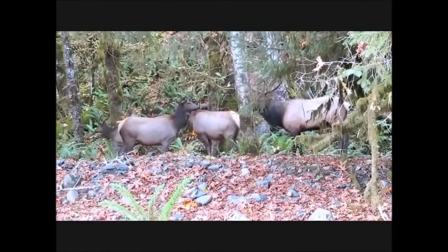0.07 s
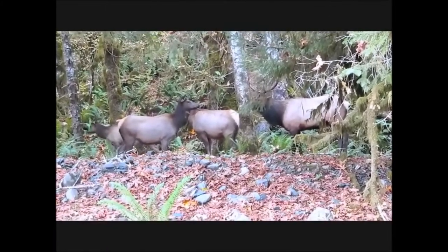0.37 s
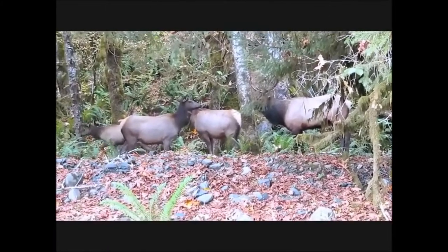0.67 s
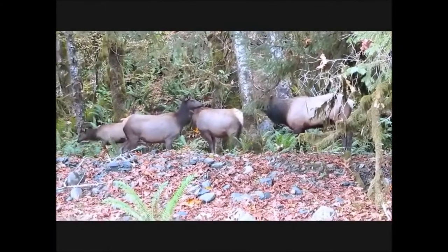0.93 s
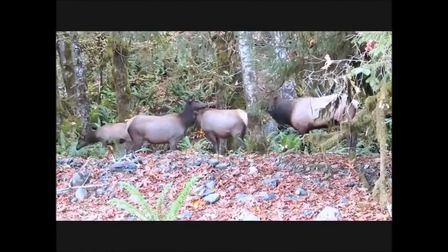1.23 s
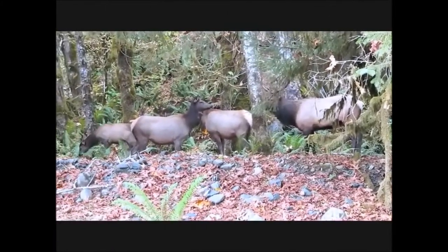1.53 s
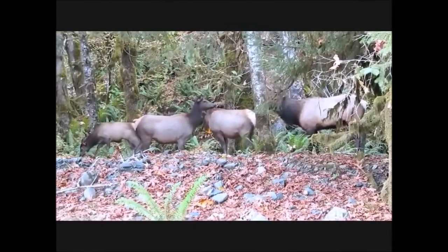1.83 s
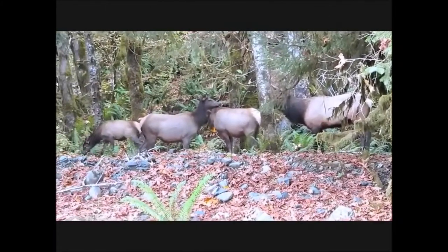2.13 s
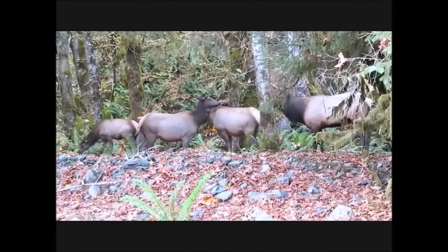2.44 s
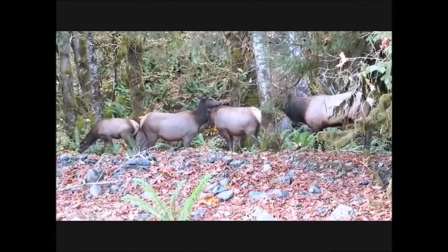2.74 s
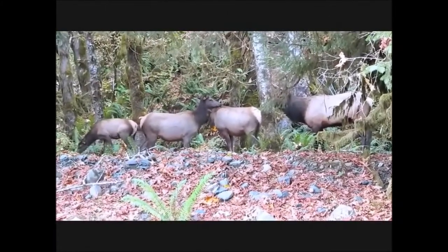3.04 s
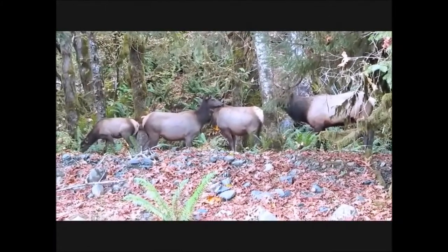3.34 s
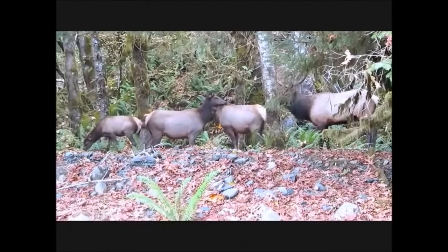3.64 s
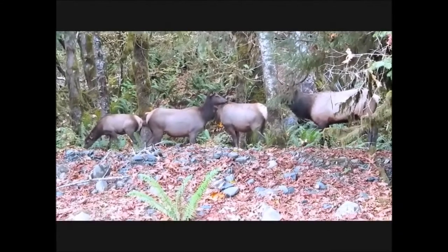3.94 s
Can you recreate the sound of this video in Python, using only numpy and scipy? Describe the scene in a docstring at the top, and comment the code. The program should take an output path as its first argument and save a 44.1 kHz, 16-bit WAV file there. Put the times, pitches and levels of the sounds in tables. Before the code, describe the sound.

Chattering birds in the woods, joined by sliding elk calls and rapid knocks on a trunk.

```python
"""Elk and squabbling birds at the forest edge

High elk mews slide down through the throat's resonances while birds squabble in fast twitters,
sharp notes, squeals and two thin whistles. Rapid woody knocks, like a woodpecker's drumming,
ring a trunk and peter out within a second and a half. An engine idles close by with a faint
whine over a soft bed of forest air, and the trees scatter the calls."""
import sys
import numpy as np
from scipy import signal
from scipy.fft import rfft, irfft
from scipy.io import wavfile
from scipy.ndimage import uniform_filter1d, map_coordinates

SR = 44100
rng = np.random.default_rng(int(sys.argv[2]) if len(sys.argv) > 2 else 0)


def put_to_file(sound):
    """Save the sound as 16-bit audio at rate SR, in the file named by the first command-line argument."""
    columns = np.atleast_2d(sound).T  # one column per channel
    safe = np.clip(columns, -1, 1)
    whole_steps = np.round(safe * 32767)
    wavfile.write(sys.argv[1], SR, whole_steps.astype(np.int16))


N = 176400


def amp(db):
    """Decibels to gain."""
    return 10 ** (np.asarray(db) / 20)


def unit_rms(x):
    """Scales to rms 1."""
    return x / np.sqrt(np.mean(x ** 2) + 1e-20)


def along(points, t):
    """Reads every column of an automation curve at the times t."""
    at, *columns = np.transpose(points)
    return [np.interp(t, at, c) for c in columns]


def across(points, hz):
    """Reads every column of a spectrum on a log-frequency axis."""
    at, *columns = np.transpose(points)
    return [np.interp(np.log(hz + 1), np.log(at + 1), c) for c in columns]


def add(mix, start, sound):
    """Mixes a stereo sound in at a start time in seconds."""
    part = mix[:, max(round(start * SR), 0):][:, :sound.shape[1]]
    part += sound[:, :part.shape[1]]


def wobble(t, rate_hz):
    """Smooth random modulation of about unit depth."""
    return map_coordinates(rng.standard_normal(512), [(t - t[0]) * rate_hz], order=3, mode="wrap")


def phase(hz):
    """Running phase of a pitch curve."""
    return 2 * np.pi * np.cumsum(hz) / SR


def fade(t, rise_s=.00072, fall_s=.005):
    """Attack, hold and release on quarter-sine ramps."""
    attack = np.sin(np.pi / 2 * np.clip((t - t[0]) / rise_s, 0, 1))
    release = np.sin(np.pi / 2 * np.clip((t[-1] - t) / fall_s, 0, 1))
    return attack * release


def place(x, pan_db, degrees, spacing_m=.054, sound_m_per_s=343):
    """Pans by level and arrival time; positive is left."""
    lag = spacing_m * np.sin(np.radians(degrees)) / sound_m_per_s
    delay = np.exp(-2j * np.pi * np.fft.rfftfreq(len(x), 1 / SR) * lag)
    return np.array([x * amp(pan_db / 2), irfft(rfft(x) * delay, len(x)) * amp(-pan_db / 2)])


def echoes(x, t60_s, taps_per_s=2000):
    """Sparse reflections off trunks and leaves, with one decay time or a curve of them by band."""
    taps = rng.standard_normal((2, SR)) * (rng.random((2, SR)) < taps_per_s / SR)
    taps[:, :100] = 0  # pre-delay
    hz, t, bands = signal.stft(taps, SR, nperseg=256)
    t60 = across(t60_s, hz)[0][:, None] if np.ndim(t60_s) else t60_s
    tail = signal.istft(bands * np.exp(-np.log(1000) * t / t60), SR, nperseg=256)[1]
    return signal.fftconvolve(x, tail / np.linalg.norm(tail, axis=1, keepdims=True), axes=1)[:, :N]


# Drifting idle speed: t/s, cycle rate/Hz
IDLE_SPEED = [(0, 17.6), (.8, 17.65), (1.3, 17.9), (1.95, 17.72), (2.25, 17.25), (2.65, 18.1), (2.85, 17.7),
              (3.1, 18.2), (3.45, 18.42), (4, 17.55)]
# Exhaust harmonics: multiple of the cycle rate, relative level/dB
EXHAUST_ORDERS = [(1, -22), (2, 0), (3, -16), (4, -2), (5, -4), (6, -10), (7, -24), (8, -21), (12, -32),
                  (13, -31)]
# Engine bay whine: t/s, f/Hz, level/dB
BAY_WHINE = [(0, 528.3, -68), (1.6, 533, -70), (2.03, 532, -69), (2.22, 515, -64.5), (2.65, 548, -72.5),
             (2.82, 529, -66.5), (2.95, 485, -81)]

def engine(throb_db=-46, pipe_smear=.55):
    """A low exhaust throb and a thin wavering whine, dead centre; the pipe delays the higher orders."""
    t = np.arange(N) / SR
    cycle = phase(along(IDLE_SPEED, t)[0])
    throb = sum(amp(db + .88 * wobble(t, 6.87)) * np.cos(k * cycle - pipe_smear * k ** 2)
                for k, db in EXHAUST_ORDERS)
    hz, db = along(BAY_WHINE, t)
    whine = amp(db + 1.8 * wobble(t, 33)) * np.sin(phase(hz * (1 + .01 * wobble(t, 41))))
    return amp(throb_db) * throb + whine


# Tone of the air bed: f/Hz, relative noise density/dB
AIR_SPECTRUM = [(60, 2.5), (130, -5), (200, -6), (330, -18), (600, -15.5), (1200, -21.5), (3800, -24),
                (6300, -29), (9800, -32), (11000, -40.5), (15500, -49)]
# How mono the bed is: f/Hz, left-right correlation
AIR_CORRELATION = [(250, 1), (500, 0.92), (1000, 0.73), (3000, 0.98), (12000, 0.59)]

def forest_air(level_db=-58.5):
    """Steady low rush and far hiss of the forest."""
    hz = np.fft.rfftfreq(2048, 1 / SR)
    shape = (2, len(hz), N // 512 + 5)
    left, spread = rng.standard_normal(shape) + 1j * rng.standard_normal(shape)
    shared = np.clip(across(AIR_CORRELATION, hz)[0], -1, 1)[:, None]
    right = shared * left + np.sqrt(1 - shared ** 2) * spread
    bands = np.array([left, right]) * amp(across(AIR_SPECTRUM, hz)[0][:, None])
    return amp(level_db) * unit_rms(signal.istft(bands, nperseg=2048, noverlap=1536)[1][:, :N])


def bird_tone(hz, overtone_db=-41):
    """A nearly pure tone with a trace of its octave."""
    angle = phase(hz)
    return np.sin(angle) + amp(overtone_db) * np.sin(2 * angle)


def chirp(hz, length_s, sweep):
    """One tiny downward sweep under a bell-shaped envelope."""
    progress = np.arange(0, length_s, 1 / SR) / length_s
    return np.sin(np.pi * progress) ** 2 * bird_tone(hz * np.exp(sweep * (.5 - progress)))


# Fader ride of the farther birds: t/s, level/dB
FLOCK_LEVEL = [(0, -50.5), (.15, -55.5), (.35, -52), (.55, -45.5), (.8, -42.5), (.95, -54), (1.27, -62.5),
               (1.35, -51), (1.55, -58), (1.9, -55.5), (2.2, -46.5), (2.6, -56.5), (2.92, -67), (3.1, -88),
               (3.72, -89), (3.75, -61.5), (3.87, -52)]
# Centre of their pitch range: t/s, f/Hz
FLOCK_CENTRE = [(.2, 3968), (1.3, 3709), (1.6, 2844), (2.2, 3397), (2.9, 3057), (3.9, 3726)]
FOLIAGE_T60_S = .05

def flock(slots_per_s=330, lowest_hz=2350, highest_hz=5500):
    """A cloud of random chirps, half blurred by the foliage, swelling with the squabble."""
    out = np.zeros((2, N))
    for slot, (late, sharp, long, loud, side) in enumerate(rng.standard_normal((2400, 5))):
        start = (slot + late / 2) / slots_per_s
        hz = along(FLOCK_CENTRE, start)[0] * np.exp(.24 * sharp)
        if start < N / SR and lowest_hz < hz < highest_hz:
            grain = amp(2 * loud) * chirp(hz, length_s=.01 * np.exp(.369 * long), sweep=.22)
            add(out, start, place(grain, pan_db=1 + 3 * side, degrees=20 + 40 * side))
    return unit_rms(out + echoes(out, FOLIAGE_T60_S)) * amp(along(FLOCK_LEVEL, np.arange(N) / SR)[0])


# Twitter cues: t/s, length/s, f/Hz, level/dB
TWITTER_CUES = [(.003, 0.032, 4380, -54), (.055, .033, 4380, -54), (0.111, 0.037, 4410, -50.5),
                (0.161, 0.033, 4220, -51), (0.215, 0.05, 4590, -49), (0.28, .043, 4420, -50),
                (0.631, 0.059, 5780, -46.5), (0.683, 0.044, 5820, -40.5), (0.751, 0.0081, 4670, -34.5),
                (0.761, 0.0064, 6070, -41.5), (0.791, 0.009, 5620, -38.5), (0.816, 0.022, 5900, -41),
                (0.775, 0.013, 4470, -38), (1.062, .04, 3546, -43.5), (1.165, 0.046, 3700, -47),
                (1.288, 0.16, 4990, -52.5), (2.056, 0.046, 4100, -44), (2.156, .048, 4340, -42)]

def twitters(gap_s=.0075, sag=.09, scatter=.06):
    """Fast runs of chirps, each run sagging in pitch; yields (start, level, sound) per chirp."""
    for start, length, pitch, db in TWITTER_CUES:
        for t in np.arange(0, length, gap_s):
            late, sharp, loud = rng.standard_normal(3)
            hz = pitch * (1 + sag * (.5 - t / length) + scatter * sharp)
            grain = amp(1.8 * loud) * chirp(hz, length_s=.0048, sweep=.28)
            yield start + t + gap_s * late / 10, db, grain


# Knock cues: t/s, relative level/dB
KNOCK_CUES = [(0.012, -36), (0.054, -37.5), (0.094, -35.5), (0.134, -35), (0.178, -34), (0.217, -35),
              (0.258, -35), (0.303, -36.5), (0.339, -34.5), (0.381, -33.5), (0.425, -35), (0.47, -34.5),
              (0.51, -35), (0.553, -33.5), (0.596, -34.5), (0.637, -36.5), (0.681, -34.5), (0.725, -33.5),
              (0.769, -36), (0.814, -37), (0.859, -36), (0.951, -41.5), (1.226, -44)]
# Ring of the trunk: f/Hz, relative level/dB, t60/s
TRUNK_MODES = [(834, -12.5, 0.13), (997.7, -3, 0.075), (1045, -2.5, 0.077), (1173, -7.5, 0.037),
               (1455, -10.5, 0.019)]

def drumming(trim_db=-3.5, rise_s=.0022, vary_db=2, detune=.012):
    """Each knock rings the same few modes of a trunk, a little varied in tuning and balance."""
    out, t = np.zeros((2, N)), np.arange(8192) / SR
    for start, db in KNOCK_CUES:
        ring = 0
        for hz, mode_db, t60 in TRUNK_MODES:
            loud, sharp = rng.standard_normal(2)
            envelope = amp(mode_db + vary_db * loud) * np.exp(-np.log(1000) * t / t60)
            ring += envelope * np.sin(2 * np.pi * hz * (1 + detune * sharp) * t)
        knock = amp(db + trim_db) * ring * np.minimum(t / rise_s, 1)
        add(out, start, place(knock, pan_db=-2.5, degrees=48))
    return out


# Mew glides, one curve per call: t/s, f/Hz, level/dB before the throat
MEW_GLIDES = [
    [(.07, 1646, -56), (.135, 1630, -53), (.185, 1472, -48.5), (.25, 1466, -47.5), (.31, 1390, -51.5),
     (.35, 1298, -45), (.39, 1227, -57.5), (.51, 894, -48.5)],
    [(.95, 1662, -44), (1.005, 1646, -53.5), (1.04, 1513, -49), (1.1, 1320, -49), (1.14, 1220, -57.5),
     (1.21, 1057, -54.5), (1.27, 891, -54)],
    [(1.51, 1370, -86), (1.56, 1282, -64.5), (1.6, 1222, -67.5), (1.66, 1080, -65), (1.7, 1022, -75),
     (1.76, 870, -69), (1.84, 753, -69)],
    [(3.36, 1371, -78), (3.415, 1314, -82), (3.44, 1274, -64), (3.5, 1088, -71.5), (3.56, 978, -77),
     (3.61, 910, -82), (3.67, 797, -80)],
]
# Timbre of each mew: 0 = round, 1 = thin and nasal
MEW_NASALITY = [0.14, 0.13, 0.88, 1]
# Throat resonances: f/Hz, round gain/dB, nasal gain/dB
THROAT_COLOURS = [(850, -15, -19), (1580, -12, -24), (1870, -3, 9.5), (2620, 4.5, -3), (3970, -8.5, 3.5),
                  (4330, -38, -34), (4800, -11, 1), (6660, -24, -7.5), (7200, -15, -7.5),
                  (8300, -33.5, -27), (10200, -30, -25.5), (12000, -59, -39)]

def elk_mews(waver=.014, rough_db=2.2, rough_hz=300, odd_db=-6):
    """High, slightly rough mews slide down through the throat; round ones favour even harmonics."""
    out = np.zeros((2, N))
    for glide, nasal in zip(MEW_GLIDES, MEW_NASALITY):
        t = np.arange(glide[0][0], glide[-1][0], 1 / SR)
        hz, db = along(glide, t)
        angle = phase(hz * (1 + waver * wobble(t, rough_hz)))
        voice = 0
        for k in range(1, 10):
            round_db, nasal_db = across(THROAT_COLOURS, k * hz)
            if k > 1 and k % 2:
                round_db += odd_db
            colour_db = (1 - nasal) * round_db + nasal * nasal_db
            voice += amp(colour_db + np.sqrt(k + 1) * wobble(t, 40.6)) * np.sin(k * angle)
        envelope = amp(db + rough_db * wobble(t, rough_hz)) * fade(t, rise_s=.06, fall_s=.06)
        add(out, t[0], place(voice * envelope, pan_db=0, degrees=0))
    return out


def fluttering_tone(t, hz, flutter=.037, shimmer_db=2, rate_hz=261):
    """A bird's tone that flutters in pitch and strength."""
    tone = bird_tone(hz * (1 + flutter * wobble(t, rate_hz)))
    return tone * amp(shimmer_db * wobble(t, rate_hz))


# Sharp note cues: t/s, length/s, f/Hz, level/dB
NOTE_CUES = [(0.506, 0.034, 3420, -42.5), (0.625, 0.044, 3450, -32), (0.743, .033, 3460, -29.5),
             (0.772, 0.0147, 3110, -32), (.803, .014, 4080, -27.5), (0.865, 0.035, 3257, -34),
             (0.887, .02, 4200, -27), (1.315, 0.0317, 3150, -45), (1.755, 0.018, 3235, -47),
             (1.874, 0.027, 2990, -49), (2.123, 0.03, 3490, -36), (2.225, 0.017, 3360, -32),
             (2.236, 0.0358, 3484, -32.5), (2.346, 0.043, 3475, -34), (2.471, 0.037, 3250, -37),
             (2.586, 0.029, 3190, -49.5), (2.916, 0.026, 3190, -52), (3.787, 0.019, 3890, -43.5)]

def sharp_notes(sag=.1684, stroke_s=.0075, stroke_depth=.4, settle_s=.015):
    """Falling notes that start as scratchy downstrokes and settle into a tone."""
    for start, length, pitch, db in NOTE_CUES:
        t = np.arange(0, length, 1 / SR)
        stroke = np.cumsum(1 + .25 * wobble(t, 261)) / SR / stroke_s % 1  # uneven sawtooth
        scratch = np.exp(-t / settle_s)
        hz = pitch * (1 + sag * (.5 - t / t[-1])) * (1 + stroke_depth * scratch * (.5 - stroke))
        chop = 1 - scratch * np.cos(np.pi * stroke) ** 2  # dips between strokes
        yield start, db, fluttering_tone(t, hz) * chop * (1 - scratch / 2) * fade(t)


# Squeal cues: t/s, length/s, f/Hz, level/dB, trill depth as a share of the pitch
SQUEAL_CUES = [(.832, 0.04, 5030, -34, 0.14), (0.862, 0.0338, 4664, -35, 0.067),
               (2.269, 0.0316, 5240, -51.5, 0.076), (2.38, .034, 4890, -40, 0.034),
               (2.502, 0.0283, 4750, -46, 0.022), (3.872, 0.0463, 4360, -51.5, 0.038)]
# Pitch bend of a squeal: share of its length, pitch ratio
SQUEAL_SHAPE = [(0, 1.15), (.25, .86), (.5, 1.03), (1, .92)]

def squeals(trill_hz=180):
    """High calls that dip, rebound and sink, trilling hardest in the middle."""
    for start, length, pitch, db, depth in SQUEAL_CUES:
        t = np.arange(0, length, 1 / SR)
        trill = depth * np.sin(np.pi * t / length) * np.sin(2 * np.pi * trill_hz * t)
        hz = pitch * along(SQUEAL_SHAPE, t / length)[0] * (1 + trill)
        yield start, db, fluttering_tone(t, hz) * fade(t)


# Tone of the rasp on loud calls: f/Hz, relative noise density/dB
RASP_SPECTRUM = [(3000, -48), (6000, -5.5), (8700, -3), (11000, -18.5), (12500, -15), (13500, -46)]

def rasp(calls, relative_db=-31.5):
    """A thin hiss that swells and fades with the power of the calls."""
    power = uniform_filter1d(calls ** 2, size=3000, axis=1)
    envelope = uniform_filter1d(power, size=3000, axis=1)
    colour = amp(across(RASP_SPECTRUM, np.fft.rfftfreq(N, 1 / SR))[0])
    hiss = irfft(rfft(rng.standard_normal((2, N))) * colour, N)
    return amp(relative_db) * calls.std() * unit_rms(hiss * envelope)


# Pan of the near birds: t/s, left over right/dB
BIRD_BALANCE = [(.15, -24.5), (.65, -4.5), (.9, 1.5), (1.8, 2), (2.25, 0.5), (2.6, 9)]
# Direction of the near birds and the whistles: t/s, angle to the left/degrees
BIRD_BEARING = [(0, -32), (.6, 13), (.9, 11.5), (2.2, 13.5), (2.5, 22), (2.75, 6), (3.8, 48)]

def near_birds(faint_db=-49.5, knee_db=2):
    """Pans the twitters, notes and squeals; the fainter a call, the more the foliage blurs it."""
    clear, hidden = np.zeros((2, 2, N))
    for start, db, sound in [*twitters(), *sharp_notes(), *squeals()]:
        call = place(amp(db) * sound, *along(BIRD_BALANCE, start), *along(BIRD_BEARING, start))
        blur = 1 / (3.5 + np.exp((db - faint_db) / knee_db))
        add(clear, start, np.sqrt(1 - blur) * call)
        add(hidden, start, np.sqrt(blur) * call)
    return clear + rasp(clear) + echoes(hidden, FOLIAGE_T60_S)


# Whistle glides, one curve per bird: t/s, f/Hz, level/dB
WHISTLE_GLIDES = [
    [(2.68, 2673, -57.5), (2.785, 3276, -50), (2.838, 3140, -61), (2.865, 3500, -62), (2.925, 3800, -50.5),
     (3, 3890, -68.5)],
    [(2.68, 2150, -60), (2.75, 2290, -56.5), (2.78, 2400, -69), (2.81, 2120, -59), (2.905, 2560, -54.5),
     (3.045, 2800, -64)],
]

def whistles(waver=.022, flicker_db=3.5):
    """Two thin, wavering voices from the flock climb side by side."""
    out = np.zeros((2, N))
    for glide in WHISTLE_GLIDES:
        t = np.arange(glide[0][0], glide[-1][0], 1 / SR)
        hz, db = along(glide, t)
        voice = bird_tone(hz * (1 + waver * wobble(t, 150)), overtone_db=-34)
        envelope = amp(db + flicker_db * wobble(t, 70.5)) * fade(t)
        add(out, t[0], place(voice * envelope, pan_db=4, degrees=along(BIRD_BEARING, t.mean())[0]))
    return out


# Forest reverb, longest in the lows: f/Hz, t60/s
FOREST_DECAY = [(500, 4.4), (1000, 1.7), (3000, 1.7), (6000, 0.82), (12000, 0.18)]

def scene():
    """The animals, with sends to near reflections and forest reverb, over the engine and the air."""
    bed = engine() + forest_air()
    birds = flock() + near_birds() + whistles()
    knocks, mews = drumming(), elk_mews()
    reflections = echoes(amp(-9.5) * birds + amp(-7) * knocks, t60_s=.1)
    reverb = echoes(amp(-15) * birds + amp(-6) * knocks + amp(-10) * mews, FOREST_DECAY)
    return bed + birds + knocks + mews + reflections + reverb


def record(dry):
    """A steep low-pass at 15.6 kHz trims the very top of the mix."""
    lowpass = signal.firwin(511, 15600, window=("kaiser", 9), fs=SR)
    return signal.oaconvolve(dry, lowpass[None], "same")


dry = scene()
out = record(dry)
put_to_file(out)
```